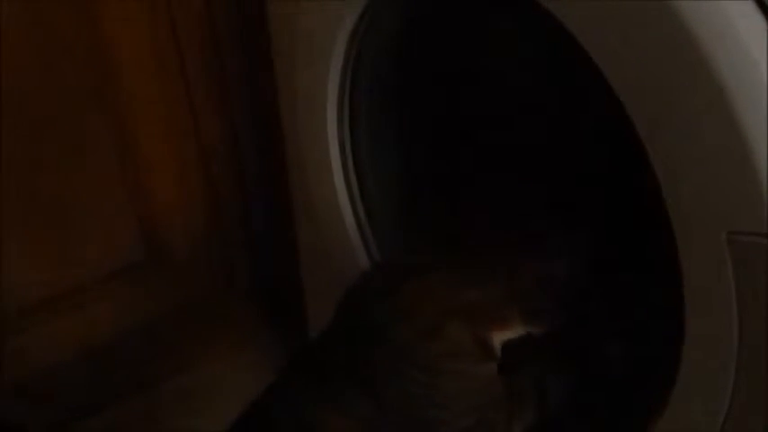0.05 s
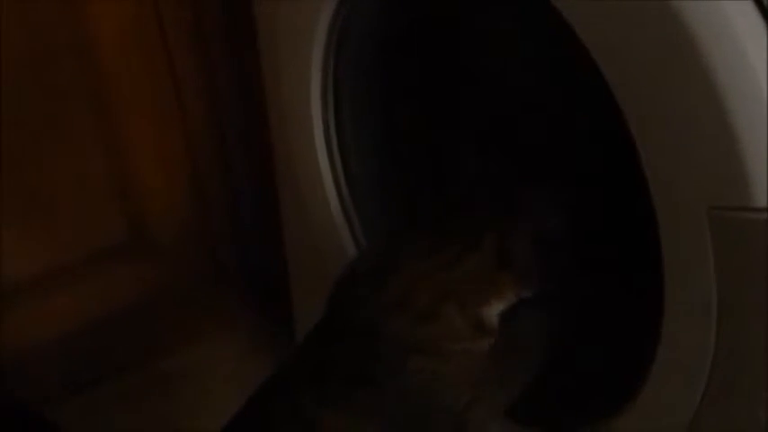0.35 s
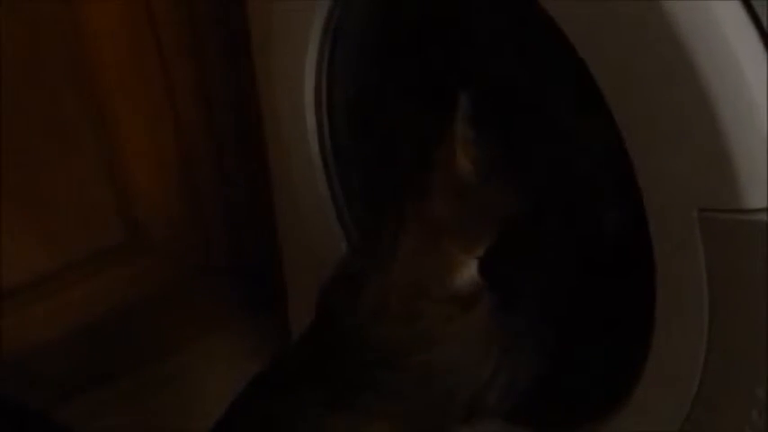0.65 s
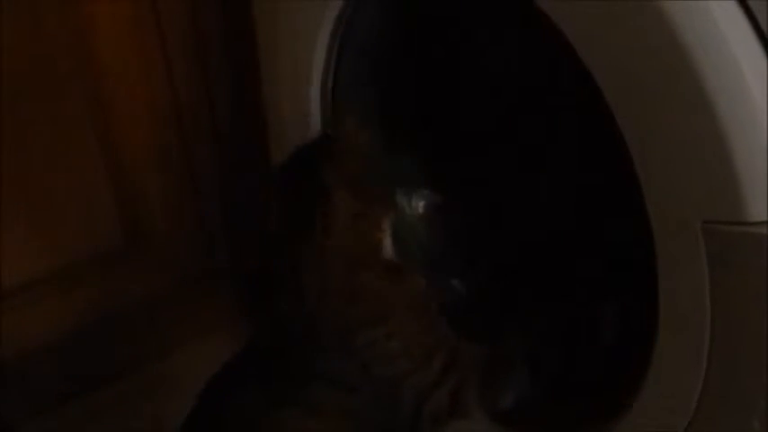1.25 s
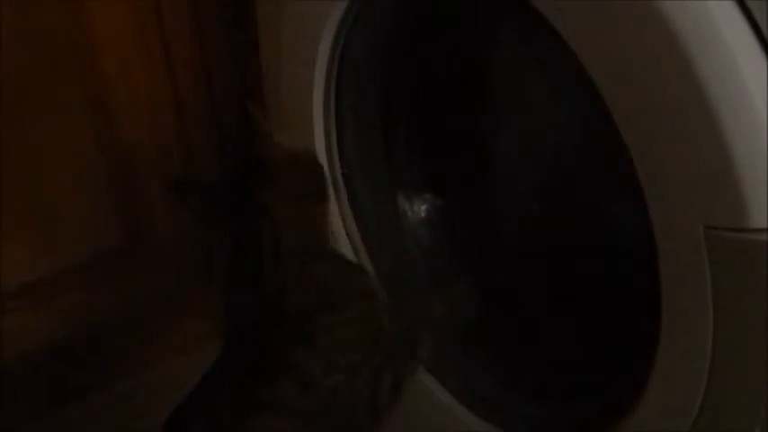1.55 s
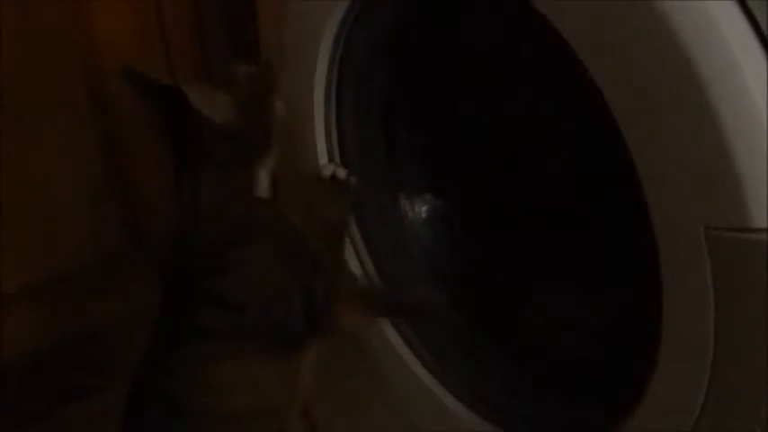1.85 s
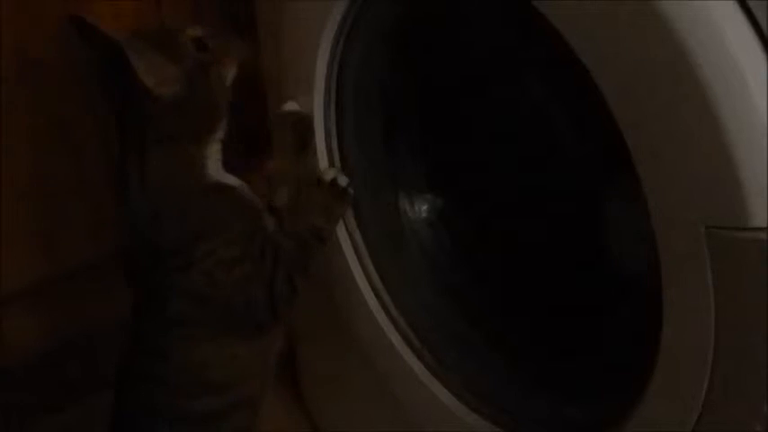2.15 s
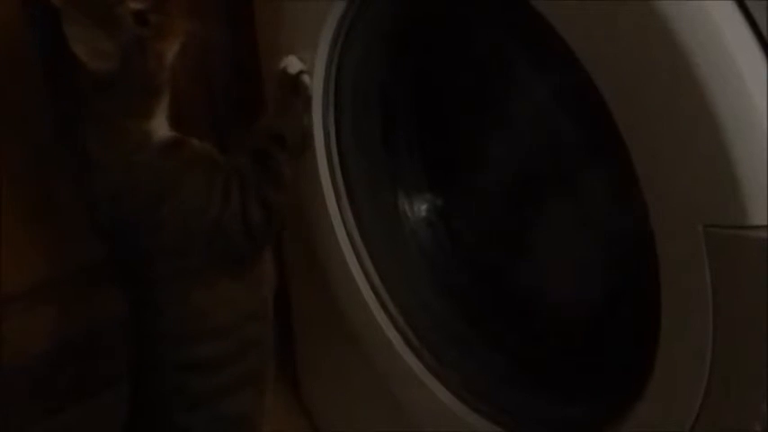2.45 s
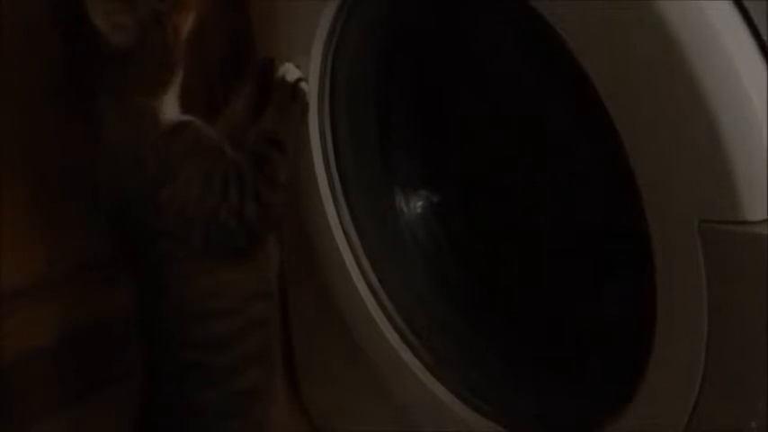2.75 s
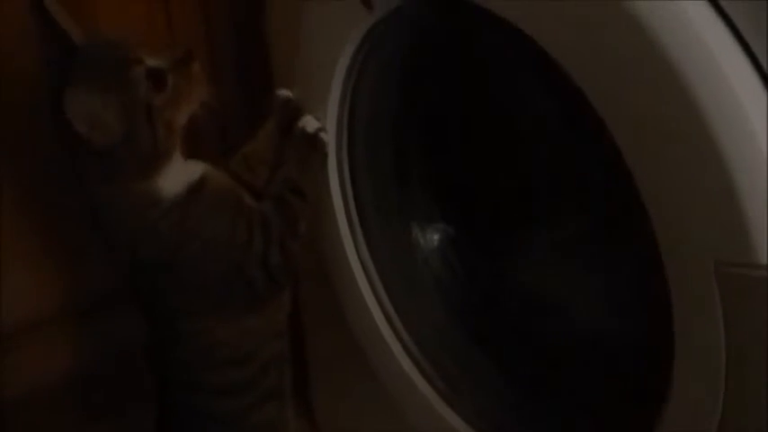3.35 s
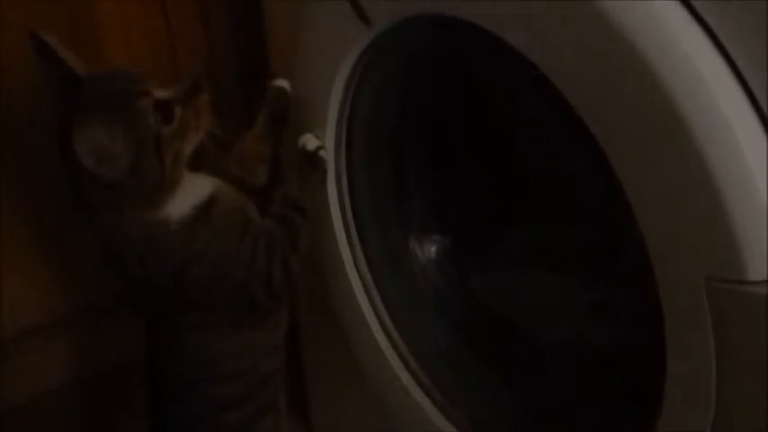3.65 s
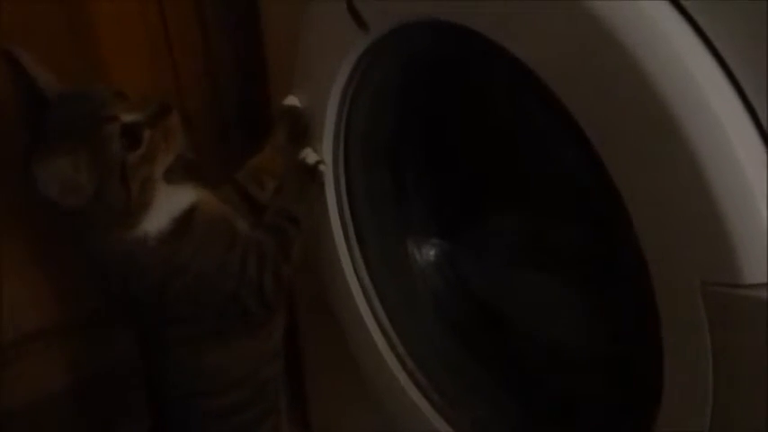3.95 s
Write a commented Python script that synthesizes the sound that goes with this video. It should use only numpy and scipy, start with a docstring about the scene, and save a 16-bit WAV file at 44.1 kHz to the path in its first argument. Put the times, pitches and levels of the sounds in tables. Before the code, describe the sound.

A washing machine turns close by in a small room, with a wavering low hum, a whirr and a thin whine. Wet laundry rustles and drops with dull splashes several times a second, slapping hardest near 0.9 seconds. At 3.2 the motor cuts out, followed by a soft thud, a light tick and a last wet slump. A sharp, briefly ringing click at 3.5 leaves faint room noise.

```python
"""Washing machine tumbling to a stop

A front-loader turns its load, close by in a small quiet room. The motor hums on multiples of the
mains and whirs in narrow resonances; wet laundry rustles, drops and slaps in the drum. The motor
cuts out, the tub knocks, the load slumps once more, and a sharp click rings over faint room noise."""
import sys
import numpy as np
from scipy import signal
from scipy.fft import rfft, irfft
from scipy.io import wavfile
from scipy.ndimage import map_coordinates

SR = 44100
rng = np.random.default_rng(int(sys.argv[2]) if len(sys.argv) > 2 else 0)


def waveform_to_disk(signal):
    """Save audio, clipped to [-1, 1], as 16-bit WAV at the path in sys.argv[1]."""
    frames = np.transpose(np.atleast_2d(signal))
    scaled = np.clip(frames, -1, 1) * 32767
    samples = np.round(scaled).astype(np.int16)
    wavfile.write(sys.argv[1], SR, samples)


N = 176400
MAINS_HZ, MOTOR_STOP_S = 50.02, 3.203


def undb(db):
    return 10 ** (np.asarray(db) / 20)


def unit(x):
    return x / np.sqrt(np.mean(x ** 2))


def times():
    return np.arange(N) / SR


def bins():
    return np.arange(N // 2 + 1) * SR / N


def curve(table, column=1):
    """A table column joined by straight lines over log frequency."""
    table = np.array(table, float)
    return np.interp(np.log(bins() + 1e-6), np.log(table[:, 0]), table[:, column])


def colour(x, gain):
    """Filter by a gain per frequency; rms 1."""
    return unit(irfft(rfft(x) * gain, N))


def wander(per_s):
    """Smooth random drift with a spread near 1."""
    knots = rng.standard_normal(1024)
    return map_coordinates(knots, [times() * per_s], order=3, mode="wrap")


def resonances(table):
    """Noise ringing in steep-sided bands, each given as centre, width and level."""
    power = sum(undb(db) ** 2 / width / (1 + ((bins() - hz) / width) ** 2) ** 3
                for hz, width, db in table)
    total = np.sqrt(sum(undb(db) ** 2 for _, _, db in table))
    return total * colour(rng.standard_normal((2, N)), np.sqrt(power))


def cloth_grains(gain, spread_db, per_s=6500):
    """Dense tiny impacts of uneven size, filtered, with a narrow notch just above the motor whine."""
    size = undb(spread_db * np.minimum(rng.exponential(size=N), 4))
    hits = rng.random(N) < per_s / SR
    notch = undb(-22 * np.exp(-((bins() - 4450) / 77) ** 4))
    return colour(size * hits * rng.standard_normal((2, N)), gain * notch)


def running(release_s):
    """1 while the motor is powered, then dying away."""
    return np.exp(-np.maximum(times() - MOTOR_STOP_S, 0) / release_s)


def strike(at_s, decay_s):
    """An envelope with an instant attack and an exponential tail."""
    age = times() - at_s
    return (age > 0) * np.exp(-np.abs(age) / decay_s)


def ring_out(age, t60_s):
    """A decay that loses 60 dB in t60_s."""
    return np.exp(-np.log(1000) * age / t60_s)


# Stereo image (frequency [Hz], likeness [0-1], left phase lead [rad], left minus right [dB])
STEREO_IMAGE = [(60, .62, .05, -2.8), (200, .65, .22, -3.9), (280, .66, .5, -3.6), (390, .84, 2.05, -3.7),
                (650, .87, 2.3, -2.8), (1500, .73, 1.95, -3.3), (2600, .61, 1.45, -3),
                (4200, .52, 1.05, -2.6), (6000, .34, 1.0, .2), (12000, .42, .15, .8)]
def stereo(pair):
    """Two unrelated versions of a sound become left and right: partly alike, shifted and unequal."""
    common, separate = rfft(pair)
    likeness, lead = curve(STEREO_IMAGE, 1), curve(STEREO_IMAGE, 2)
    pan = undb(curve(STEREO_IMAGE, 3) / 2)
    left = (likeness * common + np.sqrt(1 - likeness ** 2) * separate) * np.exp(1j * lead)
    return irfft(np.array([left * pan, common / pan]), N)


def tone(hz, db, drift_rad):
    """A sine placed in the stereo image."""
    k = int(hz * N / SR)
    lead, pan = curve(STEREO_IMAGE, 2)[k], undb(curve(STEREO_IMAGE, 3)[k] / 2)
    phase = 2 * np.pi * hz * times() + drift_rad + rng.uniform(0, 2 * np.pi)
    return np.sqrt(2) * undb(db) * np.array([pan * np.sin(phase + lead), np.sin(phase) / pan])


# Fader ride of the boom, the strongest hum partial (time [s], level before trim [dB])
BOOM_RIDE = [(0.02, -22.5), (0.07, -20), (0.54, -22), (0.59, -26), (0.95, -25), (0.99, -28.5),
             (1.17, -19.5), (1.6, -20.5), (1.69, -24), (1.79, -23), (1.88, -27), (2.28, -21), (2.32, -23),
             (2.4, -21.5), (2.5, -25), (2.63, -22.5), (2.69, -28), (3.18, -20.5)]
# Fader ride of the octave above the boom (time [s], level before trim [dB])
OCTAVE_RIDE = [(0.05, -34), (0.34, -43.5), (0.94, -35.5), (0.96, -39.5), (1.44, -32.5), (1.87, -44.5),
               (1.95, -36.5), (2.47, -36), (2.51, -47), (2.58, -36.5), (2.68, -46), (3.18, -32.5)]
# Weaker hum partials (multiple of the mains [ratio])
HUM_HARMONICS = [2, 3, 6, 10, 11, 12, 13, 14, 16]
# Balance of those partials, in the same order (level [dB])
HUM_LEVELS = [-49, -60, -51.5, -41.5, -49, -47, -38, -48, -49.5]
def motor_hum(boom_trim_db=0.26, octave_trim_db=5):
    """Wavering magnetic hum; the cabinet resonates with the fourth multiple of the mains and booms."""
    boom_db = np.interp(times(), *np.array(BOOM_RIDE).T) + boom_trim_db + wander(25.18)
    octave_db = np.interp(times(), *np.array(OCTAVE_RIDE).T) + octave_trim_db
    hum = tone(4 * MAINS_HZ, boom_db, 0.055 * wander(22.23))
    hum += tone(8 * MAINS_HZ, octave_db, 0.46 * wander(28))
    for harmonic, db in zip(HUM_HARMONICS, HUM_LEVELS):
        hum += tone(harmonic * MAINS_HZ, db + 4.5 * wander(7.89), 0.46 * wander(10))
    return hum * running(release_s=0.019)


# Resonances the running motor excites (centre [Hz], width [Hz], level [dB])
WHIRR_BANDS = [(402, 37, -42), (603.4, 11.7, -39.5), (675, 75, -39), (2436, 123, -44), (2635, 39, -48),
               (2959, 165, -50), (3967, 65, -56)]
# Thin, high motor whine (centre [Hz], width [Hz], level [dB])
WHINE_BANDS = [(4144, 25, -53), (4217, 33, -53)]
def motor_whirr(pulse_depth=0.3, flutter_db=2):
    """Motor resonances pulse with the hum under a fluttering whine."""
    ripple = np.mean([np.cos(2 * np.pi * k * MAINS_HZ * times()) for k in (2, 4)], axis=0)
    whine = resonances(WHINE_BANDS) * unit(undb(flutter_db * wander(30)))
    whirr = resonances(WHIRR_BANDS) * (1 + pulse_depth * ripple)
    return (whirr + whine) * running(release_s=0.0099)


# EQ of the cloth rustle (frequency [Hz], relative gain [dB])
RUSTLE_EQ = [(30, -23), (60, -19), (120, -6.5), (270, -5), (340, -8.5), (460, 0.5), (740, -4), (1100, -7.5),
             (1550, -9.5), (2100, -17), (2900, -19), (3500, -26), (4800, -29.5), (6500, -35), (10000, -37),
             (15000, -42.5)]
def drum_rustle(level_db=-31, swell_db=1.75):
    """Wet cloth rustles against the turning drum and fades once the motor stops."""
    rustle = cloth_grains(undb(curve(RUSTLE_EQ)), spread_db=1.5)
    return rustle * undb(level_db + swell_db * wander(12)) * running(release_s=0.17)


# EQ of the room's noise bed (frequency [Hz], relative gain [dB])
ROOM_EQ = [(30, -11), (100, -10), (270, -10.5), (400, -0.5), (750, -9.5), (1500, -15), (3000, -19),
           (5000, -24.5), (9000, -27), (12500, -33), (15000, -32)]
# Faint drones in the room (frequency [Hz], level [dB])
ROOM_DRONES = [(146, -67), (243, -62.5), (291, -69), (389, -60)]
def room_tone(air_db=-47):
    """A soft bed of noise with a few gently wavering tones."""
    air = stereo(colour(rng.standard_normal((2, N)), undb(curve(ROOM_EQ))))
    drones = sum(tone(hz, db + 2 * wander(5.9), 0.5 * wander(4.8)) for hz, db in ROOM_DRONES)
    return undb(air_db) * air + drones


# EQ of the wet splash, ahead of the muffling (frequency [Hz], relative gain [dB])
SPLASH_EQ = [(30, -33), (90, -6), (280, -4), (480, 0), (800, -2), (1500, -7), (2500, -14.5), (3500, -23),
             (5000, -29), (8000, -37.5), (15000, -42)]
# Laundry dropping in the drum (peak time [s], peak level [dB], rise [s], decay [s])
FALL_CUES = [(.055, -25.5, 0.026, 0.095), (.235, -29, .02, 0.037), (.485, -27, 0.077, 0.08),
             (.72, -37, .015, 0.023), (.811, -27, .003, 0.018), (.86, -20.5, 0.015, 0.051),
             (1.095, -29.5, 0.03, 0.032), (1.33, -27, 0.02, .06), (1.52, -29.5, 0.052, 0.044),
             (1.74, -29, 0.044, 0.12), (1.86, -39, 0.023, 0.022), (1.962, -24, 0.013, 0.028),
             (2.21, -31, 0.057, 0.049), (2.49, -27.5, 0.027, 0.045), (2.605, -25.5, 0.017, 0.025),
             (2.86, -27, 0.016, 0.088), (3.11, -26, 0.0085, 0.07), (3.301, -29.5, 0.02, .025),
             (3.43, -29, 0.019, 0.062)]
def laundry_falls(muffle_hz=8000):
    """Each fall is a swell of splashy grains; the wet cloth muffles its own treble."""
    t, power = times(), 0
    for at, db, rise, decay in FALL_CUES:
        swell = undb(db) * np.exp(-np.maximum((at - t) / rise, (t - at) / decay))
        power = power + swell ** 2
    muffle = 1 / np.hypot(1, bins() / muffle_hz)
    return cloth_grains(undb(curve(SPLASH_EQ)) * muffle, spread_db=2.4) * np.sqrt(power)


# Hard landings within the heavier falls (time [s], level [dB])
SLAP_CUES = [(0.856, -20.5), (3.098, -35), (3.429, -29)]
def wet_slaps(hz=600, width_hz=600):
    """A heavy wet fold lands with a dull smack."""
    envelope = sum(undb(db) * strike(at, decay_s=0.018) for at, db in SLAP_CUES)
    return envelope * resonances([(hz, width_hz, 0)])


def tub_knock(at_s=3.288, hz=97, gain_db=-31.5):
    """The tub thuds softly as it comes to rest."""
    age = np.maximum(times() - at_s, 0)
    attack = 1 - np.exp(-age / 0.0044)
    return tone(hz, gain_db, 0) * attack * ring_out(age, t60_s=0.12)


def light_tick(at_s=3.352, hz=4200, width_hz=680, level_db=-38):
    """A brief, thin tap just after the motor stops."""
    return resonances([(hz, width_hz, level_db)]) * strike(at_s, decay_s=0.0037)


# EQ of the click's crack (frequency [Hz], relative gain [dB])
CRACK_EQ = [(100, -13), (250, 0), (900, -3), (1600, -12), (3300, -9.5), (5700, -20), (7000, -17),
            (9000, -32), (15000, -37)]
# The final click and its bounces (time [s], gain [dB])
CLICK_CUES = [(3.4994, -3), (3.503, -1.5), (3.510, -2)]
# Ring of the clicking part (frequency [Hz], relative level [dB], time to fall 60 dB [s])
CLICK_MODES = [(1584, -4.5, .09), (1750, -14, .07), (2200, -7.5, .07), (3200, -11, 0.057), (3650, -12, .04),
               (4120, -18, .04), (4620, -4.5, 0.044), (4650, -3.5, 0.046), (4915, -9, 0.051),
               (6510, -11, 0.05), (6830, -16, 0.036), (8200, -23, .04)]
def final_click(crack_db=-32.5, crack_decay_s=0.0069, ring_db=-28, detune=0.012):
    """A part clicks and bounces: each contact is a crack of noise plus slightly detuned ringing modes."""
    click = np.zeros((2, N))
    crack = colour(rng.standard_normal((2, N)), undb(curve(CRACK_EQ)))
    for at, db in CLICK_CUES:
        start = int(at * SR)
        age = np.arange(N - start) / SR
        contact = undb(crack_db) * crack[:, start:] * np.exp(-age / crack_decay_s)
        for hz, mode_db, t60_s in CLICK_MODES:
            detuned_hz = hz * (1 + detune * rng.standard_normal((2, 1)))
            phase = 2 * np.pi * detuned_hz * age + rng.uniform(0, 2 * np.pi, (2, 1))
            contact += undb(ring_db + mode_db) * ring_out(age, t60_s) * np.sin(phase)
        click[:, start:] += undb(db) * contact
    return click


def with_room_echo(sound, wet_db=-9, t60_s=0.27):
    """The small room adds a short, diffuse tail."""
    age = np.arange(SR // 2) / SR
    build_up = 1 - np.exp(-age / 0.0079)
    tail = rng.standard_normal((2, len(age))) * build_up * ring_out(age, t60_s)
    tail /= np.sqrt(np.sum(tail ** 2, axis=1, keepdims=True))
    return sound + undb(wet_db) * signal.fftconvolve(sound, tail, axes=1)[:, :N]


# Dull body of the cabinet panels (centre [Hz], width [Hz], level [dB])
PANEL_BANDS = [(221, 39, -41.5), (424, 53, -33.5)]
def cabinet_rumble():
    """The click sets the panels rumbling briefly."""
    return resonances(PANEL_BANDS) * strike(at_s=CLICK_CUES[0][0], decay_s=0.077)


def scene():
    """The mix: the tumbling machine, its closing click and the room."""
    tonal = motor_hum() + tub_knock()
    tumbling = motor_whirr() + drum_rustle() + laundry_falls() + wet_slaps()
    ending = light_tick() + with_room_echo(final_click()) + cabinet_rumble()
    return tonal + stereo(tumbling + ending) + room_tone()


def record(dry):
    """A steep low-pass trims the treble above 15.8 kHz."""
    return signal.sosfilt(signal.ellip(10, 0.2, 80, 15800, fs=SR, output="sos"), dry)


dry = scene()
out = record(dry)
waveform_to_disk(out)
```